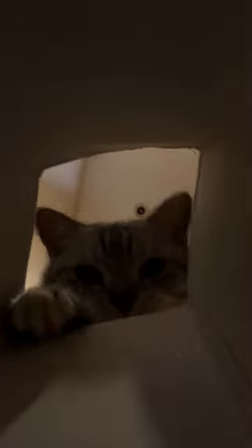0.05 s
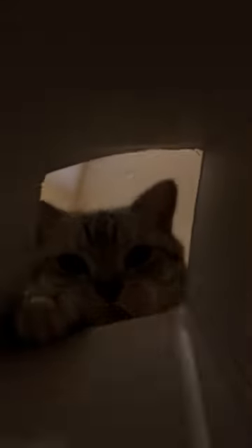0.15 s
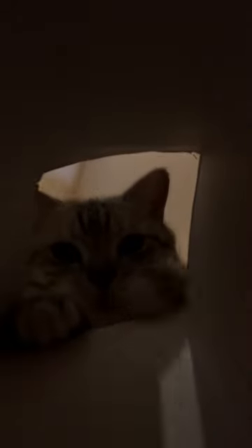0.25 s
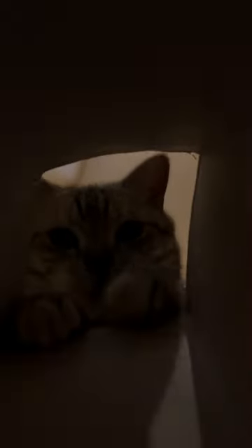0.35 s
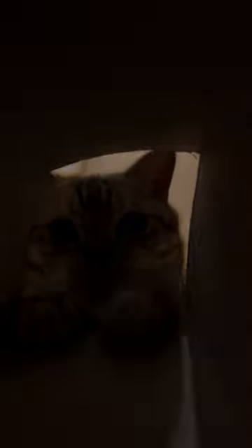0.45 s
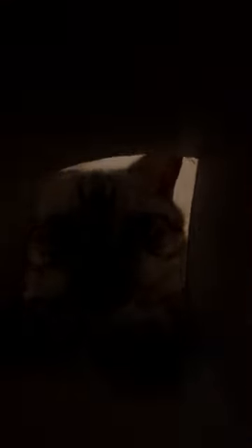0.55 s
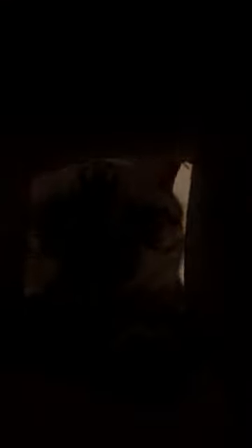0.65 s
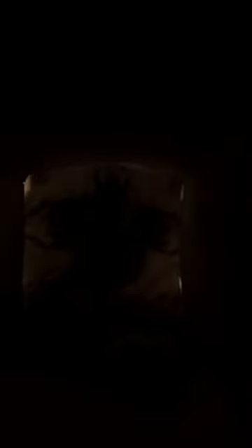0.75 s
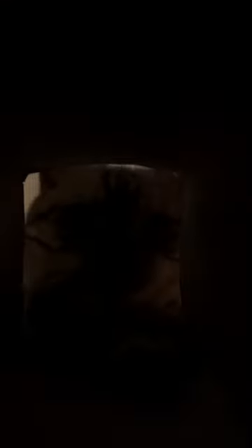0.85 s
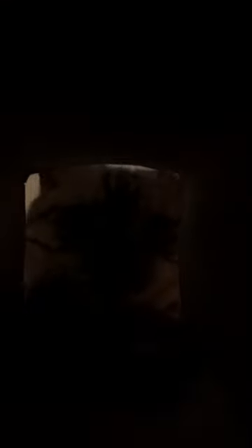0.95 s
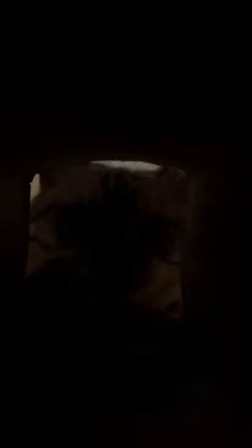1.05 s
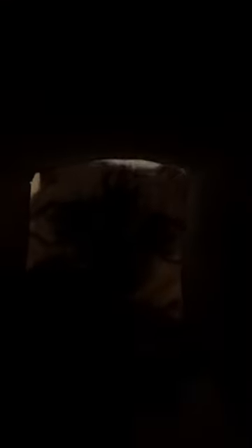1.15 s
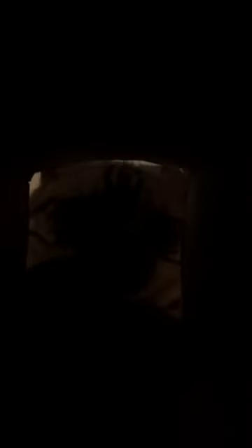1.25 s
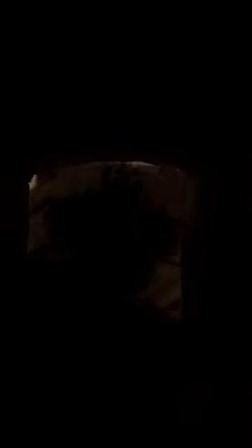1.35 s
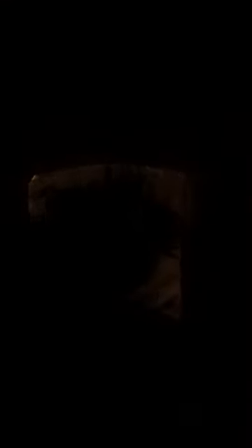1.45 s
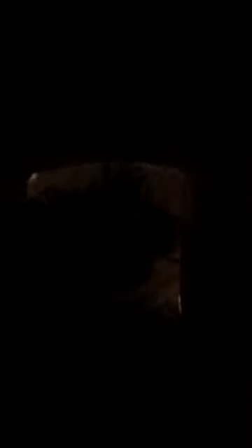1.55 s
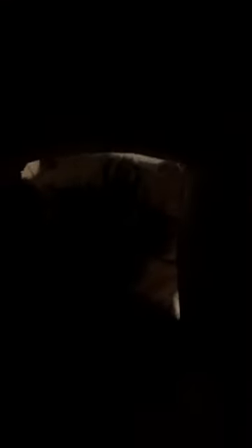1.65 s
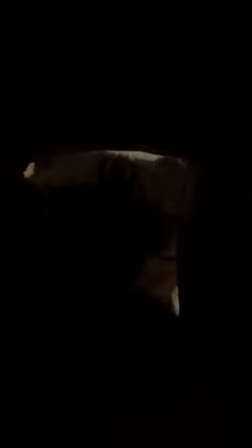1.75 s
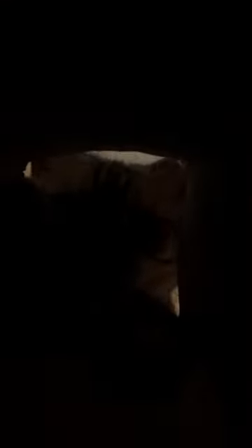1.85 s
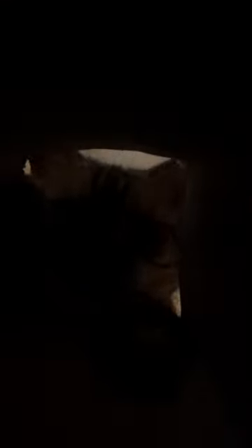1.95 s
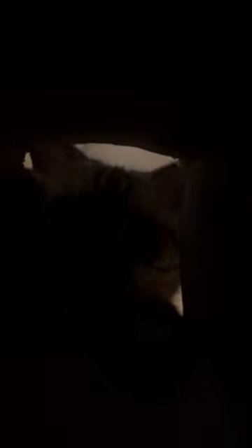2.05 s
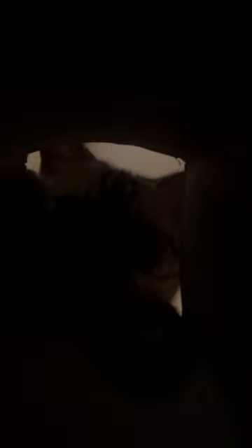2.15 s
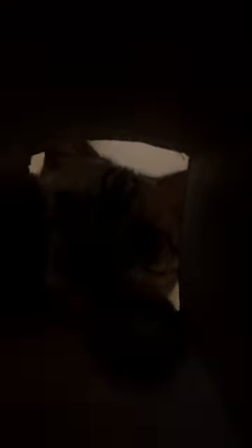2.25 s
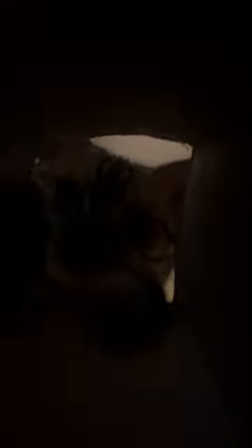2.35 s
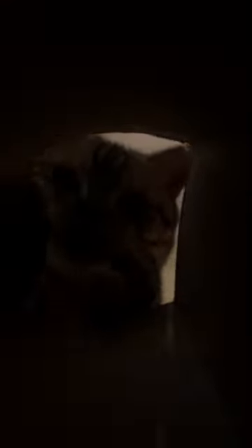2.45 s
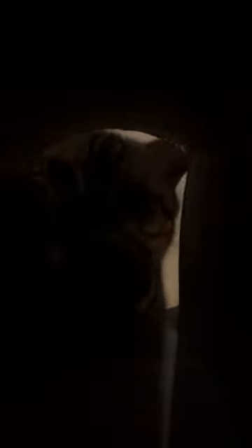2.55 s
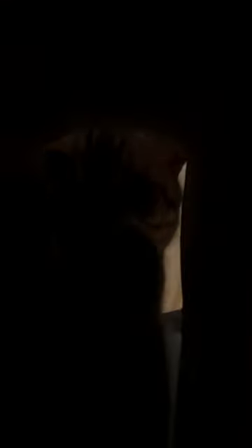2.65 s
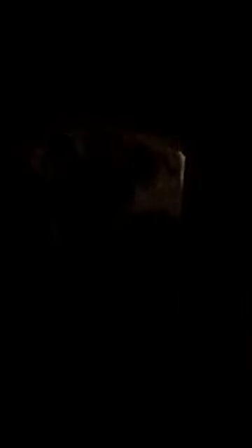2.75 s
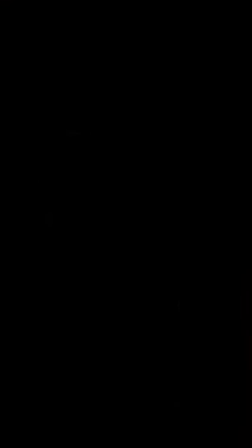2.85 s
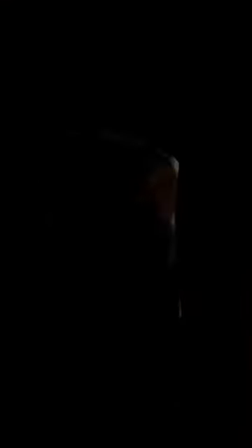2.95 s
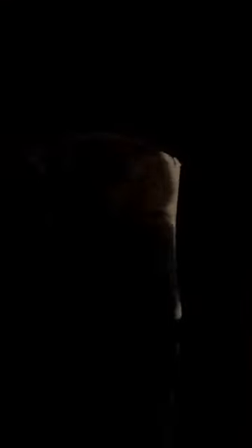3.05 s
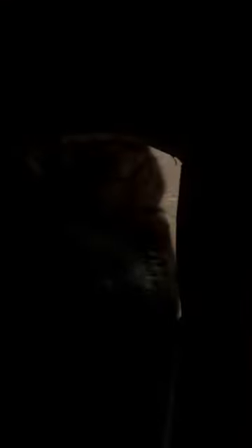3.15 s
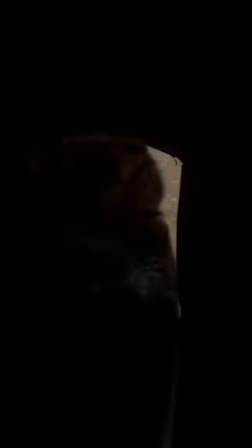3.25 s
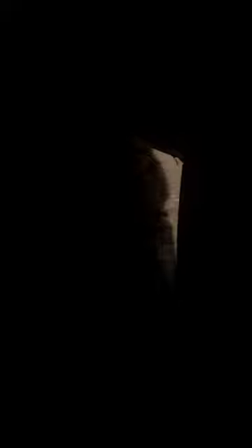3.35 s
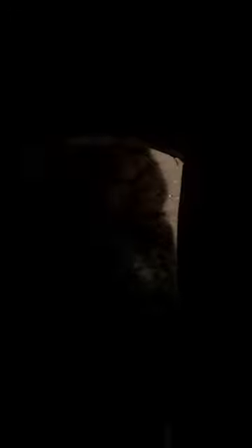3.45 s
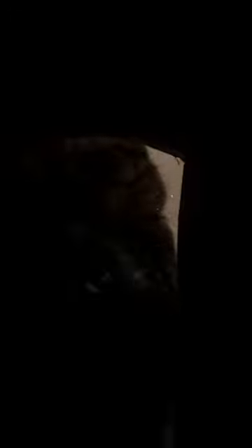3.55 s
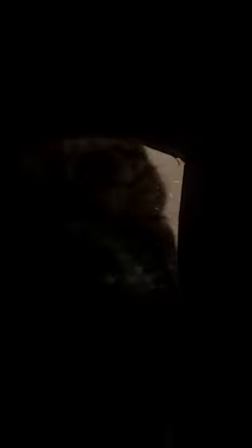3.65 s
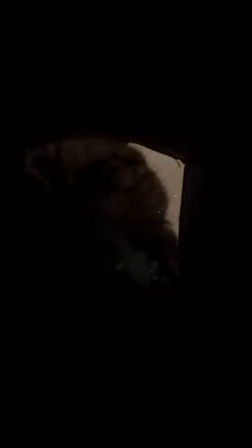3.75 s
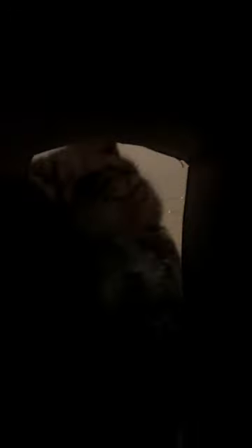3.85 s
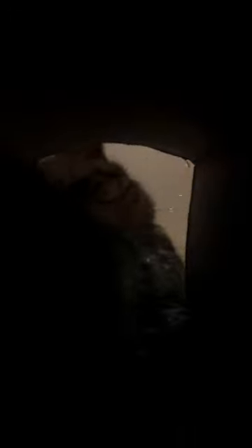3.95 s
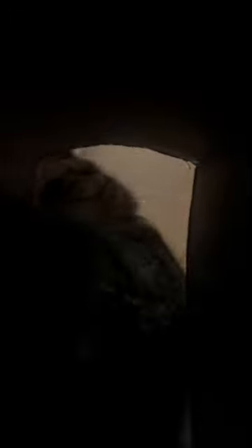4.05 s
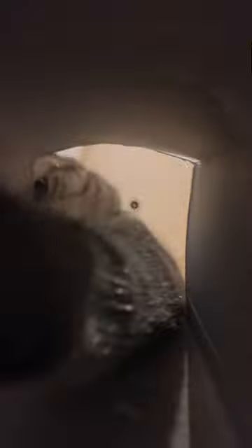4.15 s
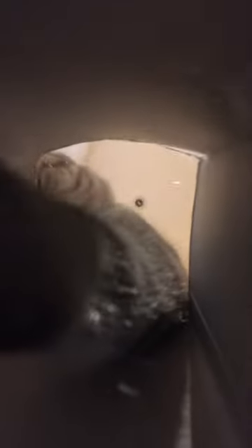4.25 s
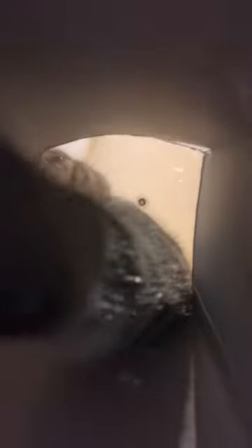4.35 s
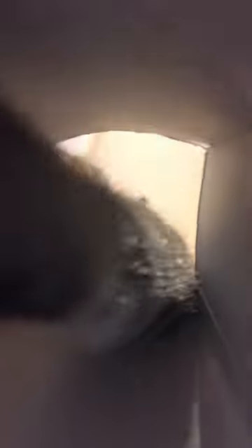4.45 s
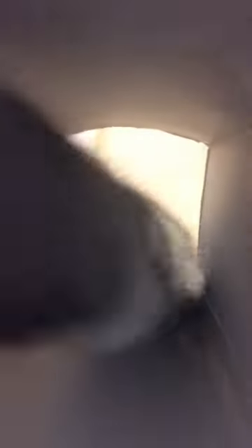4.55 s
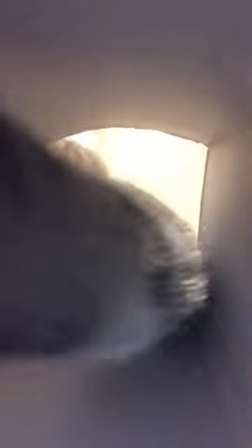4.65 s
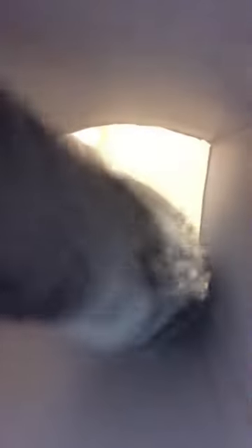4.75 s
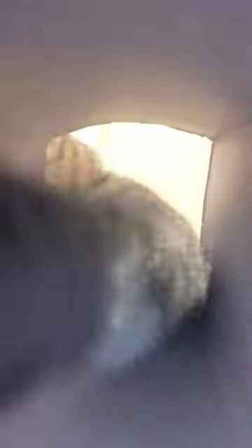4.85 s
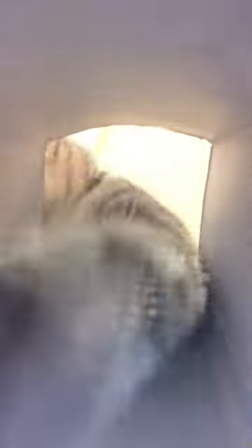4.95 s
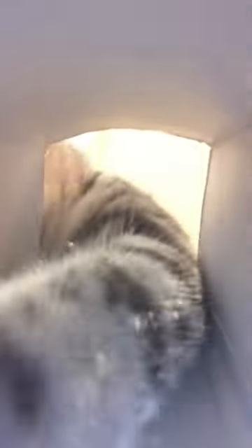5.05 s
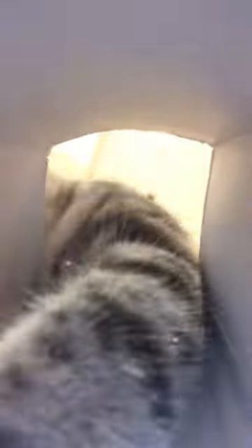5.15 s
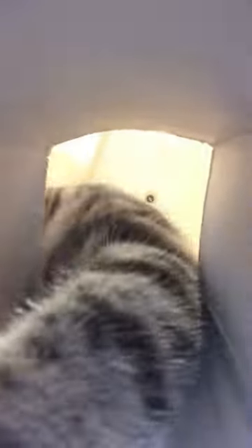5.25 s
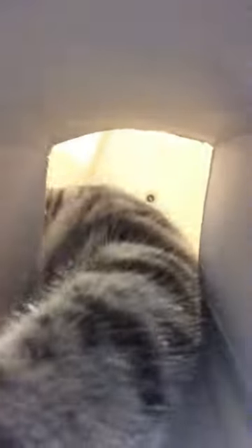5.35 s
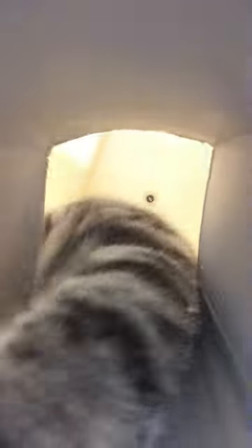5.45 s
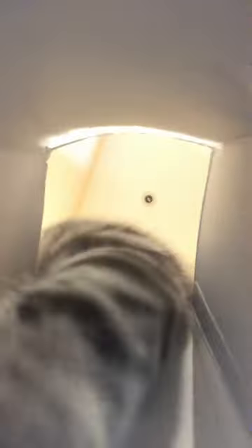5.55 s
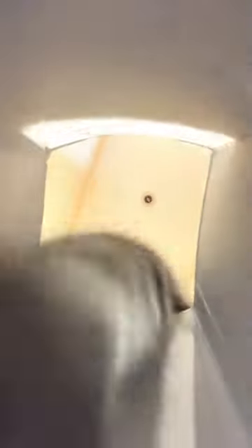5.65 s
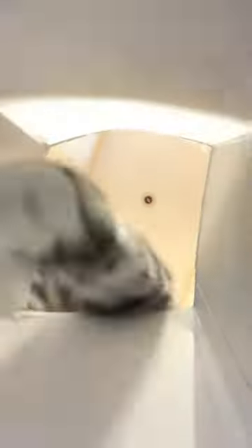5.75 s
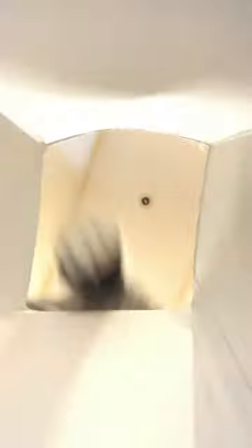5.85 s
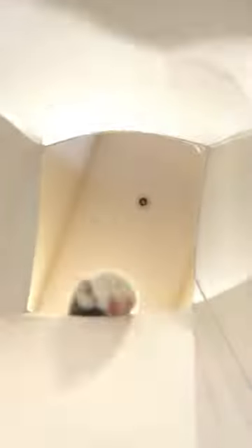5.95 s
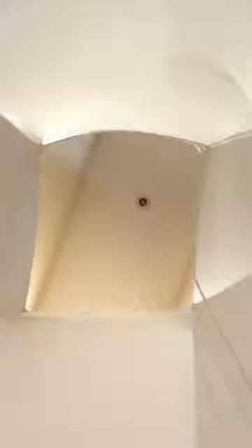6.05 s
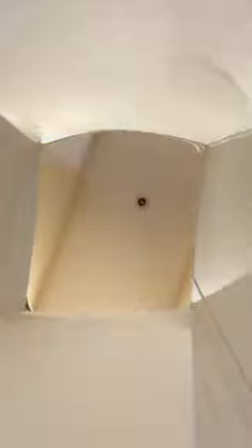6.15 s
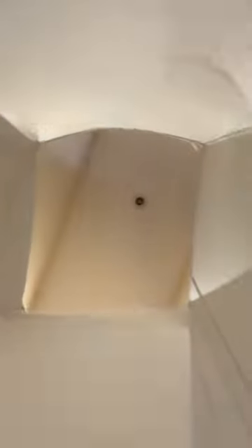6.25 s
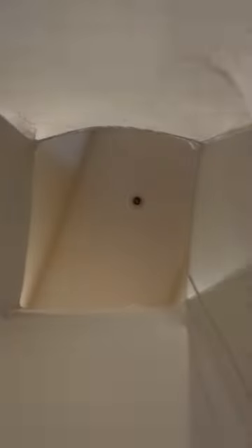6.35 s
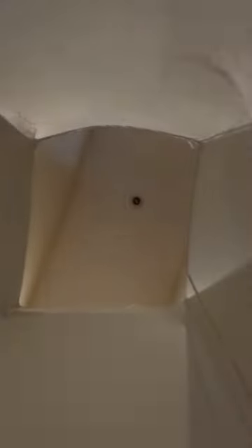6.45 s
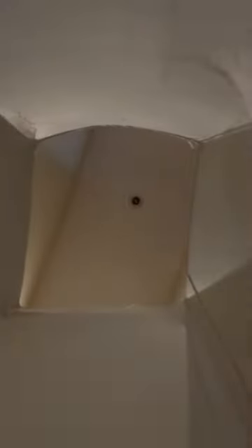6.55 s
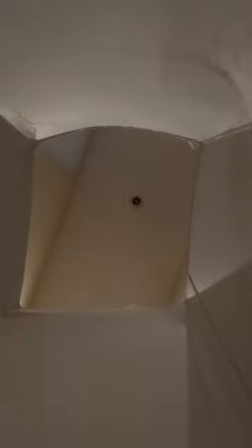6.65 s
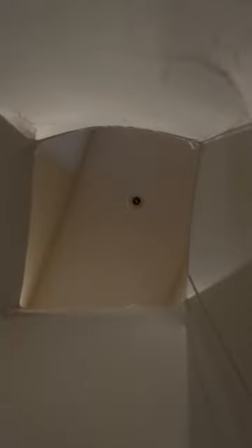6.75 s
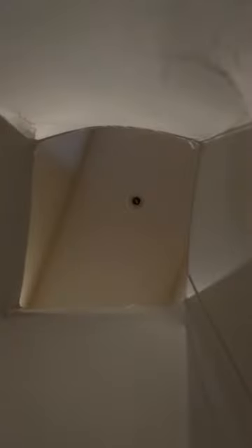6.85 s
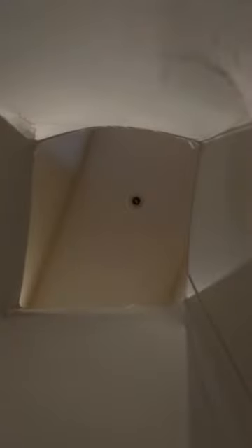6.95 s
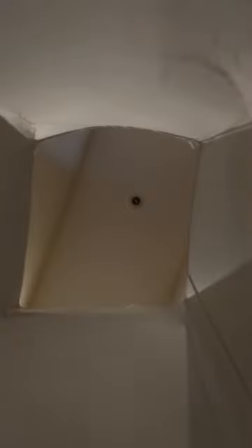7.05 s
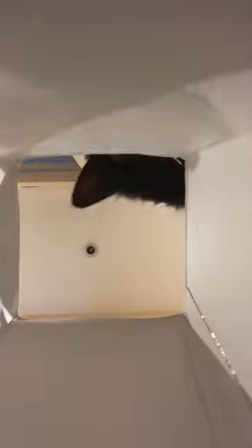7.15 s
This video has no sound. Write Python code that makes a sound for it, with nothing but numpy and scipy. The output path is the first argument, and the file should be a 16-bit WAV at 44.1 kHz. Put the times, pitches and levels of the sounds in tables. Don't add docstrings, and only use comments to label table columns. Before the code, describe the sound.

A cat's paws thump, knock and scratch irregularly inside a cardboard box, with sharp claw clicks over a low wavering hum, then quiet room noise.

```python
import sys
import numpy as np
from scipy import signal
from scipy.fft import rfft, irfft
from scipy.io import wavfile
from scipy.ndimage import uniform_filter1d

SR = 44100
rng = np.random.default_rng(int(sys.argv[2]) if len(sys.argv) > 2 else 0)


def waveform_to_disk(signal):
    frames = np.transpose(np.atleast_2d(signal))
    scaled = np.clip(frames, -1, 1) * 32767
    samples = np.round(scaled).astype(np.int16)
    wavfile.write(sys.argv[1], SR, samples)


def ratio_of_db(decibels):
    return 10 ** (np.asarray(decibels, float) / 20)


N = 317961
CHANGE_S = 7.132

# [f/Hz, density/dB per Hz]
ROOM_SPECTRUM = [(25, -44), (60, -15), (110, -14), (200, -24.5), (480, -26.5), (730, -20), (900, -30.5),
                 (1500, -34), (1900, -45.5), (2400, -42), (3300, -49), (4800, -50.5), (6500, -62),
                 (16000, -70)]
# [t/s, hum f/Hz, bass level/dB]
OPENING = [(0, 102, -13), (.8, 101, -7), (1.3, 107.3, -0.5), (2.3, 108.8, 1.5), (4.4, 102.7, 5),
           (5.2, 105.2, 0.5), (5.8, 105.2, 0), (6.299, 106.3, 1.5), (7.2, 109, -2)]
# [f/Hz, width/Hz, level/dB]
WALL_MODES = [(115, 24, 5), (190.2, 49, -2), (264, 118, 0), (377.2, 49, -4.5), (519.5, 45, -8),
              (570, 117, -2), (687, 96, -8), (1057, 107, -11.5), (1319, 130, -15.5)]
# [f/Hz, width/Hz, level/dB]
ROCKING_MODES = [(49.4, 53, 0)]
# [f/Hz, width/Hz, level/dB]
CARD_MODES = [(1328, 390, 4), (2022, 294, 6), (2382, 400, 4.5), (3380, 360, 2), (4243, 460, 3),
              (4850, 780, 0.5), (6100, 2500, -11)]
# [f/Hz, width/Hz, level/dB]
AIR_MODES = [(7040, 5300, 2), (11100, 11730, 4.5), (11960, 13100, 2)]
# [t/s, pressure level/dB, slide level/dB]
RUBS = [(0, -42, -16.5), (.7, -44.5, -10), (.93, -44, -21), (1.1, -38.5, -36), (1.32, -46.5, -23),
        (1.78, -44.5, -17), (2.03, -39.5, -27.5), (2.6, -54.5, -3), (3.03, -32, -45), (3.33, -49, -52),
        (3.72, -41, -16.5), (4.42, -32.5, -22), (4.75, -36, -18), (5.001, -36, -26), (5.25, -51, -28),
        (5.45, -37, -16), (5.86, -46.5, -19.5), (6.4, -44.5, -20)]
# [peak t/s, half length/s, pressure level/dB, slide level/dB]
STROKES = [(0.116, 0.04, -38, -26), (1.44, 0.099, -39, -6), (1.627, 0.097, -27.5, -22.5),
           (2.3, 0.15, -44, -11.5), (2.712, 0.04, -36.5, -13), (2.777, 0.06, -33.5, -13),
           (2.877, 0.057, -29, -12.5), (3.505, 0.068, -40, -23), (3.94, 0.13, -47, -44),
           (4.12, 0.099, -55, 4), (4.33, 0.064, -30.5, -36), (5.135, 0.072, -31.5, -15),
           (5.698, 0.075, -38.5, -7), (5.95, 0.13, -34, -14)]
# [start t/s, end t/s, card level/dB, air level/dB]
SCRAPES = [(1.385, 1.506, -63, -49.5), (1.924, 1.988, -50.5, -60), (2.835, 2.873, -43, -54.5),
           (2.896, 2.929, -29, -40), (2.934, 2.957, -25, -22.5), (3.088, 3.131, -34.5, -52.5),
           (3.2, 3.288, -43, -69), (3.341, 3.364, -53, -51), (3.353, 3.411, -27, -39),
           (3.51, 3.532, -37, -65), (3.584, 3.598, -41, -56), (3.631, 3.641, -29, -72.5),
           (3.658, 3.673, -44, -81), (3.776, 3.834, -45, -65), (3.913, 3.941, -37, -60),
           (3.997, 4.044, -34, -45), (4.159, 4.2, -52, -53), (4.606, 4.662, -42.5, -78),
           (4.652, 4.674, -32, -51), (4.797, 4.849, -41.5, -68), (4.943, 4.974, -29, -40),
           (4.964, 5.009, -33, -45), (4.337, 4.373, -52, -75), (4.24, 4.289, -55, -62),
           (4.098, 4.107, -47, -65), (5.462, 5.484, -41, -63), (5.506, 5.591, -45.5, -56),
           (5.872, 5.908, -39.5, -54), (5.971, 6, -52, -53), (5.907, 5.929, -36, -47),
           (5.995, 6.014, -35.5, -41), (6.014, 6.036, -38, -52)]
# [start t/s, length/s, f/Hz, level/dB]
SINGING = [(.06, .32, 7800, -67), (.0, 0.16, 4900, -69), (.33, 0.24, 10100, -71), (.52, 0.24, 4900, -61),
           (1.39, 0.14, 4500, -51), (5.83, 0.083, 4780, -50), (5.87, .06, 2170, -42),
           (5.87, 0.053, 2570, -54), (5.93, .04, 4700, -55), (5.995, 0.023, 1460, -29),
           (5.995, .025, 4960, -45), (6.012, .035, 4440, -47), (6.015, .025, 1470, -38)]
# [t/s, level/dB, ring f/Hz]
GRIT = [(.103, -34, 2290), (.7858, -34, 3200), (1.2, -42, 4200), (3.01, -26, 2100), (3.15, -22, 1160),
        (3.283, -26, 1090), (3.498, -30, 1300), (3.634, -26, 1100), (4.1, -39, 2500), (4.105, -45, 3800),
        (4.132, -36, 2200), (4.164, -33, 2300), (4.18, -30, 2000), (4.226, -40, 1500), (4.246, -36, 2400),
        (4.265, -38, 2300), (4.298, -29, 1500), (4.328, -36, 1450), (4.345, -32, 1550), (4.357, -48, 4100),
        (4.369, -30, 1500), (4.447, -31, 1300), (4.464, -31, 1500), (4.482, -32, 1300), (4.949, -19, 3200),
        (4.954, -24, 4400), (4.995, -20, 2200), (5.065, -41, 2000), (5.069, -41, 1800), (5.104, -31, 3800),
        (5.113, -24, 1990), (5.135, -21, 2050), (5.144, -34, 2100), (5.877, -26, 1810), (5.884, -29, 2600),
        (5.944, -38, 1400), (5.985, -37, 2200), (6.003, -27, 2150), (6.023, -28, 1460)]
# [peak t/s, peak level/dB, f/Hz]
THUMPS = [(.112, -22.5, 263), (.134, -31, 107), (.359, -30, 128), (.498, -34, 109), (1.481, -31, 135),
          (1.524, -19.5, 174), (1.621, -30, 183), (1.84, -22, 160), (1.977, -15, 112), (2.029, -22, 105),
          (2.049, -25, 116), (2.218, -23, 150), (2.553, -5, 119), (2.98, -12, 90.5), (3.075, -15.5, 143),
          (3.765, -21.5, 141), (4.102, -20, 128), (4.141, -26.5, 104), (4.27, -20, 164), (4.338, -19, 115),
          (4.381, -23, 101), (4.422, -20, 96), (4.85, -15, 126), (4.965, -19, 115), (4.994, -18, 115),
          (5.053, -12, 126), (5.15, -17, 84), (5.7, -26.5, 109), (5.95, -13, 98), (6.054, -10.5, 126)]
# [peak t/s, peak level/dB, f/Hz, length/ms]
KNOCKS = [(.107, -19.5, 593, 7), (0.488, -19, 630, 4.1), (.923, -17, 411, 4.9), (.964, -24, 497, 10.4),
          (1.122, -14, 606, 2.46), (4.62, -5, 1184, 3.45), (1.618, -17, 380, 4.6), (1.989, -20, 288, 10.2),
          (3.106, -13, 550, 3.7), (3.333, -17, 570, 5.4), (3.517, -13, 543, 9.2), (3.533, -2.5, 533, 4.2),
          (4.27, -20, 391.4, 5.2), (4.332, -18.5, 584, 3), (4.358, -20.5, 425, 8.3),
          (4.467, -14.5, 573, 6.1), (4.876, -21, 570, 14), (5.015, -15, 360, 3.6), (5.031, -1, 579, 5.5),
          (5.141, -11.5, 568, 6.8), (5.92, -5, 318, 5.8), (6.007, -8.5, 800, 5), (6.029, -9, 340, 6.6),
          (6.882, -30.5, 382, 14), (6.92, -31.5, 390, 12), (6.955, -31, 395, 11.5)]
# [peak t/s, peak level/dB, f/Hz]
TAPS = [(.342, -14, 634), (1.05, -4, 642), (1.519, -12, 513), (1.936, -22.5, 476), (1.947, -20, 402),
        (1.956, -17.5, 430), (2.02, -22, 443), (2.812, 1, 478), (2.907, -12, 615), (2.958, -15, 654),
        (2.994, -1, 570), (3.015, -21, 547), (3.067, -13.5, 850), (3.117, -27, 530), (3.616, -19, 457),
        (3.821, -13.5, 400), (3.932, -6.5, 630), (4.028, -15.5, 513), (4.451, -16, 570), (4.48, -16, 565),
        (4.848, -16, 570), (4.965, -22, 700), (4.999, -9.5, 480), (5.879, -18.5, 646)]
# [t/s, knock level/dB, knock f/Hz, thump level/dB, thump f/Hz]
BLOWS = [(1.012, -17.5, 670, -19, 112.7), (1.651, -7.5, 385, -4, 201), (2.816, -1.5, 650, -7, 116),
         (2.846, -7.5, 489, -16, 115), (2.916, -5.5, 527, -1, 142), (3.082, -10, 470, -8.5, 143.4),
         (3.21, -13.5, 470, -11.5, 158), (3.255, -15, 396, -9.5, 153), (3.35, -19, 316, -4, 115),
         (3.404, 2.5, 576, -14, 109), (3.529, -2, 570, -11, 103.6), (3.557, -7.5, 588, -19, 142),
         (3.798, -2.5, 420, -2, 165), (3.899, -11, 570, -17, 184), (3.94, -6.5, 410, -4.5, 164),
         (4.012, -9, 572, -10, 122.7), (4.184, -18.5, 287, -17.5, 113.6), (4.304, -11.5, 440, -18.5, 181),
         (4.545, -12.5, 392, -10.5, 140), (4.621, 1, 554, -15.5, 109), (4.817, -8.5, 403, -13.5, 156),
         (5.116, -7.5, 490, -1.5, 106.5), (5.524, -23, 392, 1.5, 146.6), (5.897, -29, 400, -6, 115.4)]
# [t/s, level/dB]
BLUNT_CLAWS = [(0.7873, -30), (0.917, -26.5), (0.9678, -26.5), (5.5065, -15.5), (1.6658, -19),
               (2.9149, -8.5), (2.9891, 5), (3.0086, -9), (3.094, -26), (3.15, -28), (3.327, -21),
               (3.33, -8), (3.3677, -8), (3.399, -5.5), (3.5256, -3), (3.793, -22), (3.894, -13.5),
               (3.999, -20), (4.541, -17), (4.6096, -17.5), (4.619, -19), (4.6664, -17), (4.919, -29),
               (5.105, -27), (5.523, -17), (5.663, -33)]
# [t/s, level/dB]
CLAW_PICKS = [(1.0084, -22), (1.0465, -12.5), (1.9952, -26), (2.2235, -32.5), (2.8095, -9.5),
              (2.8138, -3.5), (3.0473, -5.5), (3.053, -16.5), (3.0644, -12.5), (3.0777, -17),
              (3.1779, -22.5), (3.214, -20), (3.3, -31), (3.393, -7.5), (3.633, -41), (3.669, -35),
              (3.8802, -26), (4.014, -18), (4.575, -21), (4.5969, -10), (4.6987, -36), (4.812, -26),
              (4.843, -26), (5.027, -25), (5.0404, -17.5), (5.074, -40), (6.311, -37), (1.2885, -48),
              (3.971, -54)]
# [t/s, card level/dB, air level/dB, brightness/dB per octave]
CLAW_SNAPS = [(1.0548, -14.5, -5, 4.5), (1.118, -9.5, -5.5, 3), (1.223, -31, -24.5, 7),
              (1.5797, -18.5, -12, 6), (1.5951, 2, -11, 3), (1.7099, -33, -11.5, 7.5),
              (1.7996, -46, -33, 5), (1.9438, -14, -14, 3), (1.953, -22, -18, 3), (1.9848, -6.5, -4.5, 8.5),
              (2.046, -31, -27, 3), (2.052, -42, -21.5, 4), (2.9327, -14, -20, 3.5),
              (2.9398, -27, -17, 1.5), (2.9472, 0.5, -1.5, 5.5), (2.952, -5.5, -5, 4),
              (2.9648, -5.5, -2.5, 3), (3.2476, -12, -7.5, 2), (3.3068, -49, -33, 3), (3.406, -21, -1.5, 3),
              (3.553, -4.5, -16.5, 0), (3.929, -42, -21, 3), (3.936, -22, -31, 3),
              (4.0722, -21.5, -13.5, 10), (4.553, -35, -31, 3), (4.5858, -14.5, -16.5, -7),
              (4.8806, -20, -14, 1), (4.8859, -17.5, -15, 1), (5.6123, -60.5, -31, 3),
              (6.2605, -41, -17, 1)]


def ring(x, modes):
    out = 0
    for k, (f_hz, width_hz, level_db) in enumerate(modes):
        b, a = signal.iirpeak(f_hz, f_hz / width_hz, fs=SR)
        out = out + (-1) ** k * ratio_of_db(level_db) * signal.lfilter(b, a, x)
    return out


def unit(x):
    return x / np.sqrt(np.mean(x ** 2))


def walk(rate_hz):
    hold = int(SR / rate_hz)
    steps = np.repeat(rng.standard_normal(N // hold + 1), hold)
    return 1.7 * uniform_filter1d(uniform_filter1d(steps, hold), hold)[:N]


def add(track, t_s, sound):
    i = int(t_s * SR)
    track[i:i + len(sound)] += sound[:len(track) - i]


def room():
    f_hz = np.fft.rfftfreq(N, 1 / SR)
    table_hz, table_db = np.transpose(ROOM_SPECTRUM)
    colour_db = np.interp(np.log(f_hz + 1), np.log(table_hz), table_db)
    coloured = irfft(rfft(rng.standard_normal(N)) * ratio_of_db(colour_db), N)
    noise = ratio_of_db(-43.5) * unit(coloured) * ratio_of_db(1.3 * walk(6))
    t_s, *columns = np.transpose(OPENING)
    hum_hz, bass_db = (np.interp(np.arange(N) / SR, t_s, c) for c in columns)
    hum = np.sin(2 * np.pi * np.cumsum(hum_hz + 3.52 * walk(17)) / SR)
    hum = hum * ratio_of_db(3.5 * walk(28))
    bass = signal.sosfilt(signal.butter(2, 170, fs=SR, output="sos"), noise)
    return noise + (ratio_of_db(bass_db) - 1) * bass, ratio_of_db(-39.5 + bass_db) * unit(hum)


def rubbing_layers(pressure_db, slide_db):
    fur_db = pressure_db - 16.5 + 0.66 * slide_db
    return ratio_of_db(np.array([pressure_db, pressure_db + slide_db, fur_db]))


def rubbing(t):
    t_s, pressure_db, slide_db = np.transpose(RUBS)
    lean_db = np.interp(t, t_s, pressure_db) - 99 * (t > CHANGE_S)
    out = rubbing_layers(lean_db, np.interp(t, t_s, slide_db))
    for peak_s, half_s, stroke_db, stroke_slide_db in STROKES:
        swell = np.exp(-2 * ((t - peak_s) / half_s) ** 2)
        out = out + rubbing_layers(stroke_db, stroke_slide_db)[:, None] * swell
    return out


def patchy(grains, modes, rate_hz, patchy_db):
    out = 0
    for mode in modes:
        weighted = ratio_of_db(patchy_db * walk(rate_hz)) * grains
        out = out + ring(ring(weighted, [mode]), [(mode[0], 0.92 * mode[1], 0)])
    return unit(out)


def friction():
    t = np.arange(N) / SR
    wall, card, air = rubbing(t)
    air = air + ratio_of_db(-78) * (t < CHANGE_S)
    for start_s, end_s, card_db, air_db in SCRAPES:
        on = np.clip((t - start_s) / 0.0059, 0, 1) * np.clip((end_s + 0.0017 - t) / 0.014, 0, 1)
        wall = wall + on * ratio_of_db(card_db + 7.0)
        card = card + on * ratio_of_db(card_db)
        air = air + on * ratio_of_db(air_db)
    grains = rng.standard_normal((2, N)) * ratio_of_db(2.0 * rng.exponential(size=N)) * (rng.random(N) < .25)
    bumps = rng.standard_normal(N) * ratio_of_db(1.6 * rng.exponential(size=N)) * (rng.random(N) < .06)
    rubbed = [(hz, 1.71 * width, db + 0.24 * np.log2(hz / 500)) for hz, width, db in WALL_MODES[1:]]
    dragged = [(hz, 1.8 * width, db - 2.5 * np.log2(hz / 2500)) for hz, width, db in CARD_MODES]
    catch = ratio_of_db(1.7 * walk(120))
    out = wall * patchy(bumps, rubbed, 30, patchy_db=2.2)
    out += card * patchy(grains[0], dragged, 60, patchy_db=1.8)
    out += air * patchy(grains[1], AIR_MODES, 24, patchy_db=-0.5)
    return catch * out


def singing_fur():
    out = np.zeros(N)
    t = np.arange(SR // 2) / SR
    q = 26
    for start_s, length_s, f_hz, level_db in SINGING:
        hiss = rng.standard_normal(len(t))
        tone = unit(ring(ring(hiss, [(f_hz, f_hz / q, 0)]), [(f_hz, 2 * f_hz / q, 0)]))
        swell = np.sin(np.pi * np.clip(t / length_s, 0, 1))
        add(out, start_s, ratio_of_db(level_db) * tone * swell)
    return out


def cracking_fibres():
    out = np.zeros(N)
    t = np.arange(int(0.017 * SR)) / SR
    q, fade_s = 2.8, 0.00074
    for t_s, level_db, f_hz in GRIT:
        push = np.exp(-t / fade_s) * (rng.standard_normal(len(t)) + 4.0 * (t == 0))
        crack = ring(push, [(f_hz, f_hz / q, 0), (1.8 * f_hz, 1.2 * f_hz, -10)])
        add(out, t_s, ratio_of_db(level_db) * crack / np.abs(crack).max())
    return out


def thump_lag_s(f_hz):
    return 1.63 / f_hz * (110 / f_hz) ** 0.78


def strikes():
    knock_cycles, thump_cycles, cycles_per_db, tap_ms = 2.294, 1.958, 0.03, 3.0
    thumps = THUMPS + [(s + thump_lag_s(hz), db, hz) for s, _, _, db, hz in BLOWS]
    thumps = [(s, db, hz, 1000 * (thump_cycles + cycles_per_db * db) / hz) for s, db, hz in thumps]
    knocks = [(s, db, hz, 1000 * knock_cycles / hz) for s, db, hz, _, _ in BLOWS]
    taps = [(s, db, hz, tap_ms) for s, db, hz in TAPS]
    return thumps, knocks + taps + KNOCKS


def wave_packets(table, glide, settle, sharp, partner_db, ring_db, spread_s):
    direct, shake = np.zeros(N), np.zeros(N)
    t = np.arange(int(.1 * SR)) / SR
    for peak_s, level_db, f_hz, length_ms in table:
        phase, partner_phase, ratio = rng.random(3)
        rise_s = length_ms / 1000 * np.sqrt(sharp) / 2.456
        u = np.arange(1, int(6 * rise_s * SR)) / (rise_s * SR)
        fall = glide / max(1, f_hz * length_ms / 1500)
        angle = 2 * np.pi * np.cumsum(f_hz * np.clip(u, .15, settle) ** -fall) / SR
        packet = np.sin(angle + 2 * np.pi * phase)
        partner = np.sin((1.327 + 0.898 * ratio) * angle + 2 * np.pi * partner_phase)
        packet += ratio_of_db(partner_db) * partner
        add(direct, peak_s - rise_s, ratio_of_db(level_db) * (u * np.exp(1 - u)) ** sharp * packet)
        add(shake, peak_s - rise_s / 2, ratio_of_db(level_db + ring_db) * np.exp(-t / spread_s))
    return direct, shake


def paws():
    thumps, knocks = strikes()
    thump, slow = wave_packets(thumps, glide=0.44, settle=5.1, sharp=2.05,
                               partner_db=-16.5, ring_db=-18, spread_s=0.02)
    knock, quick = wave_packets(knocks, glide=0.56, settle=1.59, sharp=1.8,
                                partner_db=-11.5, ring_db=-7.5, spread_s=0.0032)
    out = thump + knock
    stiff = [(hz, width, db + 3.9 * np.log2(hz / 500)) for hz, width, db in WALL_MODES[2:]]
    driven = [(slow, WALL_MODES[:3], 0), (slow, ROCKING_MODES, -3),
              (quick, stiff, 0), (quick ** 1.41, CARD_MODES[:3], -9)]
    for shake, modes, level_db in driven:
        scatter = rng.standard_normal(N)
        steady, shaken = ring(ring(np.array([scatter, shake * scatter]), modes), modes)
        out += ratio_of_db(level_db) * shaken / np.std(steady)
    return out


def claws():
    out = np.zeros(N)
    t = np.arange(int(.02 * SR)) / SR
    fade = np.exp(-t / 0.0004) + ratio_of_db(-7) * np.exp(-t / 0.0017)
    blunt = [(s, db, db - 28, 0) for s, db in BLUNT_CLAWS]
    picks = [(s, db, db - 4.5, 4) for s, db in CLAW_PICKS]
    for t_s, card_db, air_db, bright_db in blunt + picks + CLAW_SNAPS:
        push = fade * (rng.standard_normal(len(t)) + 4.7 * (t == 0))
        slope_db = np.clip(0.26 * (air_db - card_db + 7.0), -6, 5)
        spot_db = 1.5 * rng.standard_normal(len(CARD_MODES + AIR_MODES))
        modes = [(hz, width, db + d + slope_db * np.log2(hz / 3000))
                 for (hz, width, db), d in zip(CARD_MODES + AIR_MODES, spot_db)]
        card_modes, air_modes = modes[:len(CARD_MODES)], modes[len(CARD_MODES):]
        air_modes = [(hz, width, db + bright_db * np.log2(hz / 9000)) for hz, width, db in air_modes]
        card = ring(ring(push, card_modes), [(2500 * ratio_of_db(slope_db), 4000, 0)])
        air = ring(push, air_modes)
        add(out, t_s, ratio_of_db(card_db) * card / np.abs(card).max() + ratio_of_db(air_db) * air / np.abs(air).max())
    return out


def scene():
    noise, hum = room()
    t = np.arange(N) / SR
    fade_in = np.clip((t - CHANGE_S) / 0.032, 0, 1)
    air = np.where(t < CHANGE_S, noise + hum, fade_in * (1.33 * noise + 0.31 * hum))
    return (air + friction() + singing_fur() + cracking_fibres() + paws() + claws())[None]


def low_pass(x):
    return signal.sosfilt(signal.butter(12, 17140, fs=SR, output="sos"), x)


def record(dry):
    x = signal.sosfilt(signal.butter(2, 35, "high", fs=SR, output="sos"), dry)
    x = signal.sosfilt(signal.ellip(6, .5, 24, 15800, fs=SR, output="sos"), x)
    return low_pass(np.tanh(1.004 * x) / 1.116)


dry = scene()
out = record(dry)
waveform_to_disk(out)
```